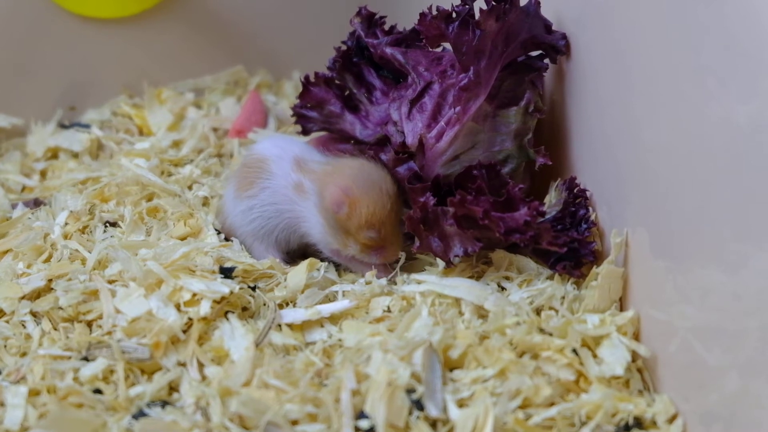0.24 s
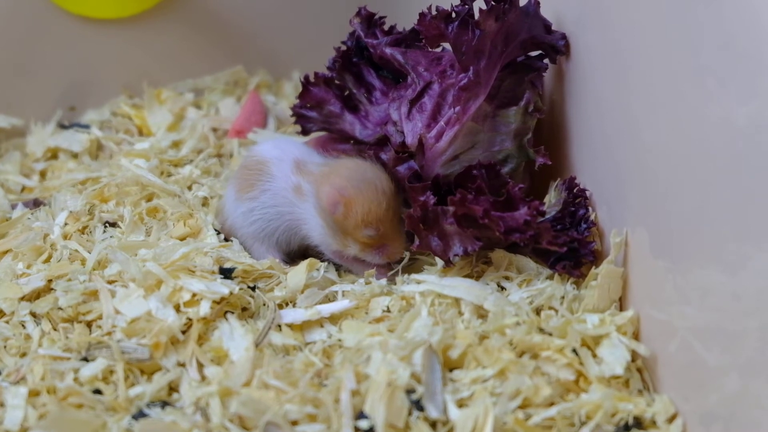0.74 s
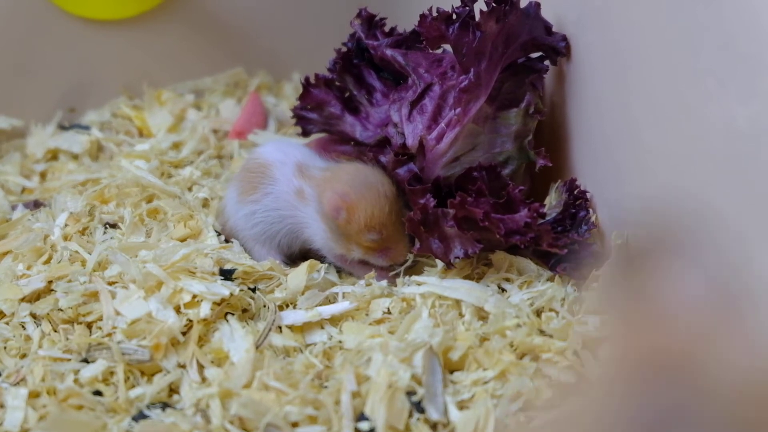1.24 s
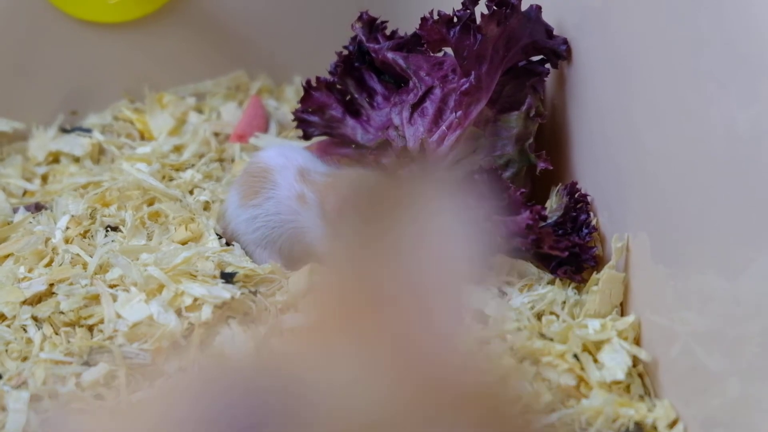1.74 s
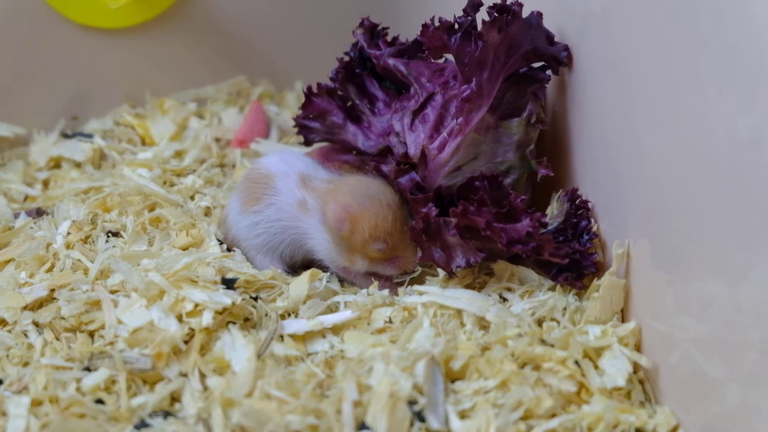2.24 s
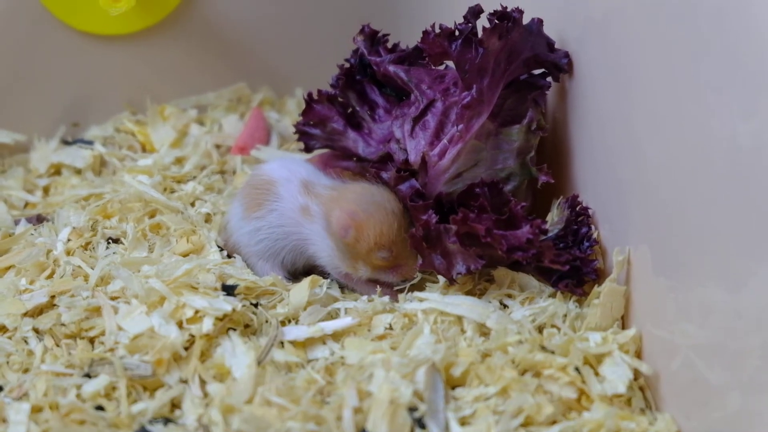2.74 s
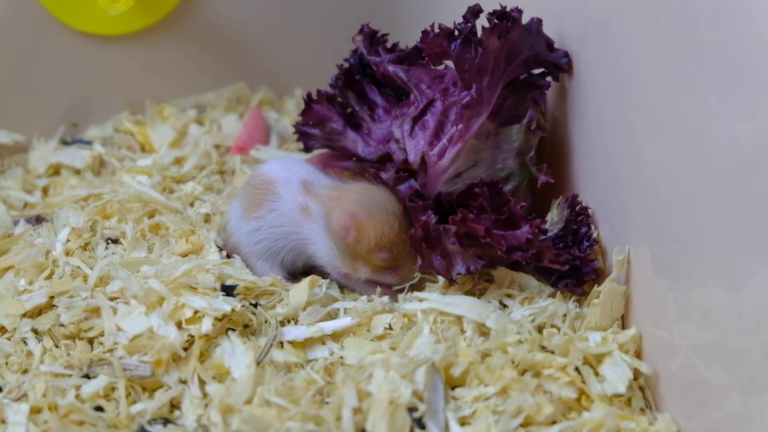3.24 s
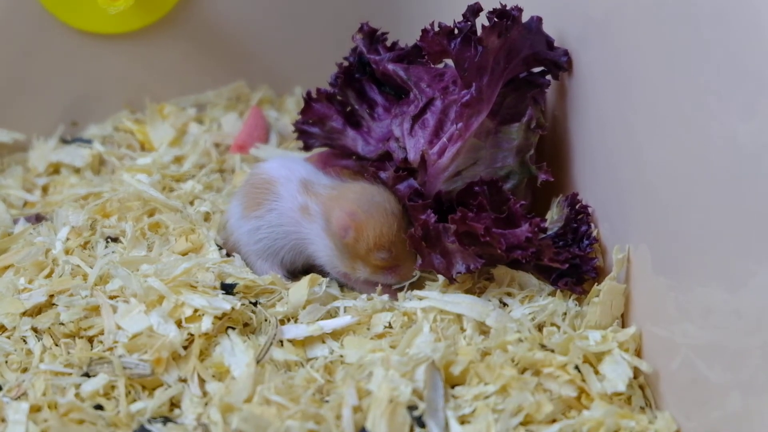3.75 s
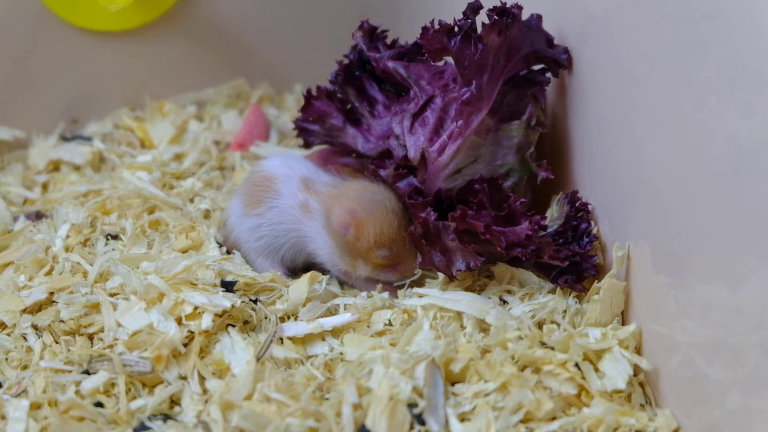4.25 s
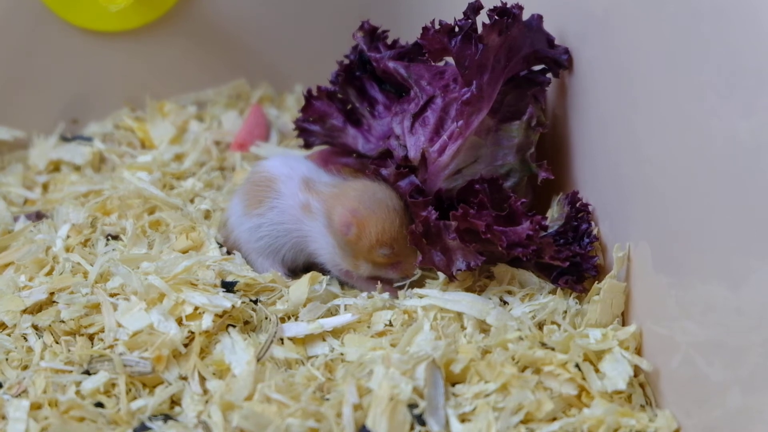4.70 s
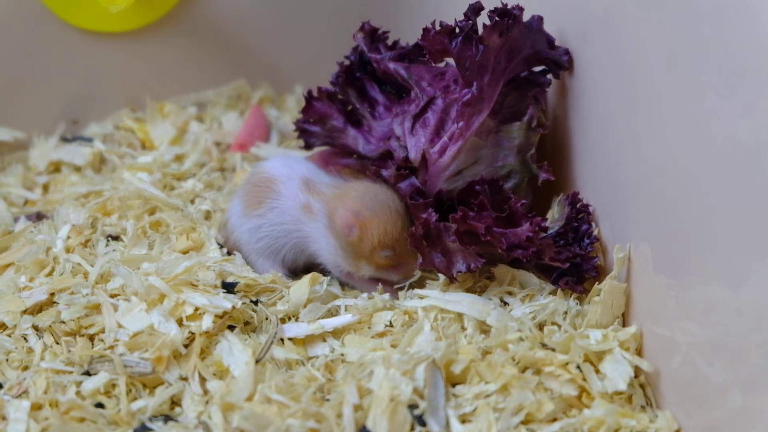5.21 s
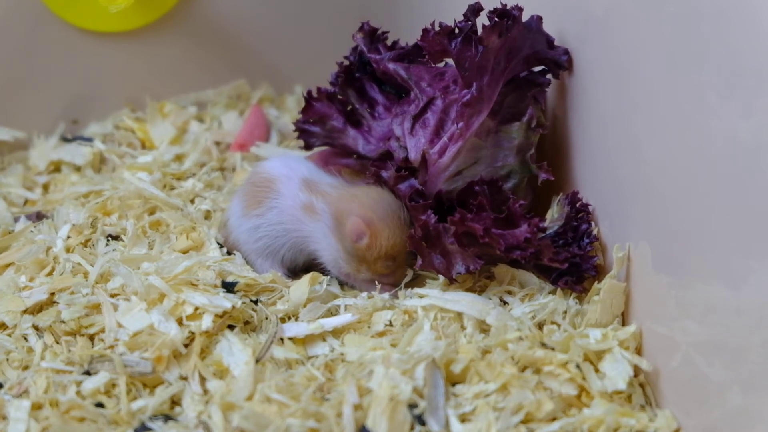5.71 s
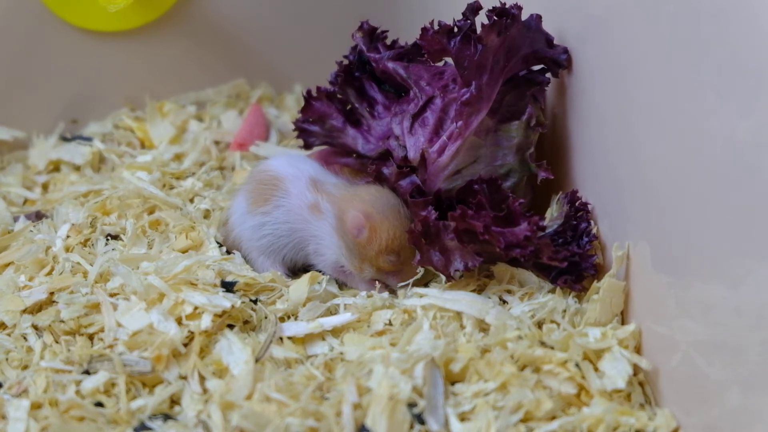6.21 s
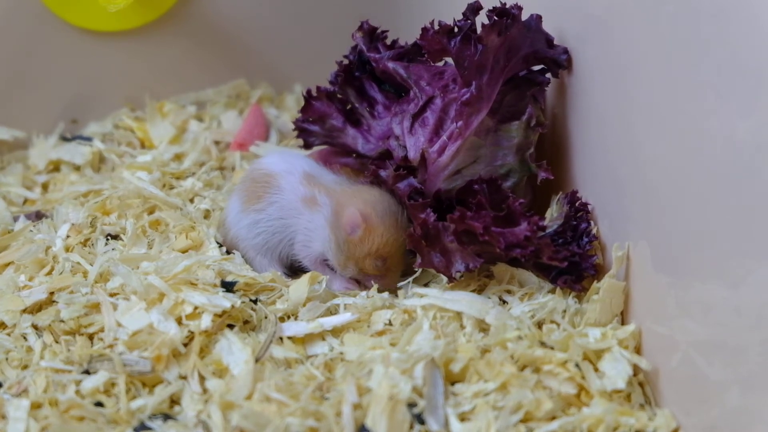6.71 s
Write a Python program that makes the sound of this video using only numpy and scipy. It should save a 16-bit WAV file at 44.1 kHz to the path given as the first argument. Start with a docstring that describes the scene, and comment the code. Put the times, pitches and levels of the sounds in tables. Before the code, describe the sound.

Small dull knocks and dry ticks against a camera stand, with faint rustling of wood shavings and leaf in a quiet, softly hissing room.

```python
"""Hamster cage in a quiet room

Near a camera on a stand, small knocks set the stand ringing low as damped sines, with a noise thud.
Dry ticks are noise bursts through three resonances; a little metal part jingles on two damped modes.
The stand sways slowly; leaf and wood shavings rustle, scuff and settle as swelling clumps of noise grains.
Microphone hiss, a wavering rumble and a faint room hum lie underneath."""
import sys
import numpy as np
from scipy.fft import rfft, irfft, next_fast_len
from scipy.io import wavfile
from scipy.ndimage import map_coordinates

SR = 44100
rng = np.random.default_rng(int(sys.argv[2]) if len(sys.argv) > 2 else 0)


def bounce(signal):
    """Save signal as a 16-bit WAV file at the path given by the first command-line argument."""
    frames = np.transpose(np.atleast_2d(signal))
    limited = np.clip(frames, -1, 1)
    pcm = np.round(limited * 32767).astype(np.int16)
    wavfile.write(sys.argv[1], SR, pcm)


N = 306936  # length in samples

# dull knocks on the stand: start_s, level_db (peak of the stand's ring), boom_db (second deep mode over that)
KNOCK_EVENTS = [(0.222, -54, -27), (0.226, -30.5, 1), (0.24, -31.5, -2.5), (0.253, -25.5, -1),
                (0.317, -48, 7), (0.354, -33.5, -2), (0.564, -41.5, -8), (0.979, -49, -13),
                (1.921, -55, -6), (2.102, -31.5, -27), (2.144, -26, -2.5), (2.431, -50, 6.5),
                (2.467, -30.5, -11), (2.53, -47.5, -1), (2.639, -37, -11), (2.816, -49.5, 3),
                (3.169, -49.5, -4), (3.274, -43.5, -4), (3.308, -50, -15), (3.361, -35.5, -10),
                (4.143, -45.5, -4), (4.22, -43, -20), (4.453, -49, -2), (4.521, -51.5, 0.5),
                (4.725, -52.5, -3), (4.829, -28.5, -36), (4.848, -16, -16), (5.025, -49.5, -12),
                (5.098, -48.5, -8), (5.347, -53, -17), (5.463, -52, -7), (5.674, -34.5, -8),
                (5.719, -39.5, -0.5), (5.771, -46, -14), (5.878, -48, -2), (5.962, -27.5, 0),
                (6.17, -49, -23.5), (6.371, -54, -18), (6.76, -60, -14)]
# bursts of rustling: start_s, length_s, level_db (top of the swell, before the buzz)
RUSTLE_BURSTS = [(0.074, .03, -74), (0.207, 0.13, -69), (0.312, 0.063, -79), (1.066, 0.14, -75),
                 (1.289, 0.064, -73.5), (1.466, 0.12, -70.5), (1.512, 0.12, -72), (1.605, 0.027, -67.5),
                 (1.71, 0.079, -69.5), (1.776, 0.06, -75.5), (1.92, 0.065, -75), (1.958, 0.11, -71),
                 (2.39, 0.11, -81), (3.133, 0.15, -73.5), (3.864, 0.19, -73.5), (4.06, 0.13, -75),
                 (4.375, 0.051, -72), (4.419, 0.032, -62), (4.513, 0.046, -62.5), (4.625, 0.045, -68.5),
                 (4.662, 0.12, -75.5), (4.722, 0.022, -62), (4.758, 0.11, -70.5), (4.84, 0.08, -63),
                 (5.384, 0.0307, -72.5), (6.586, 0.045, -85)]
# treble colour of the shavings: pitch_hz, gain_db
SHAVINGS_COLOUR = [(1940, -26), (3300, -3.5), (4990, 1), (7080, 3), (7610, 5), (8550, 3), (9300, 0),
                   (15500, -24)]
USUAL_DB = -40  # level of an ordinary knock or tick


def amp(db):
    """Decibels to a linear factor."""
    return 10 ** (np.asarray(db) / 20)


def unit(x):
    """Scales to an rms of 1."""
    return x / np.sqrt(np.mean(x ** 2) + 1e-20)


def along(points, hz):
    """Reads a curve of (Hz, value) points on a log frequency axis."""
    f, value = np.transpose(points)
    return np.interp(np.log(hz + 1), np.log(f + 1), value)


def wobble(rate):
    """A smooth random curve with so many knots a second."""
    knots = rng.standard_normal(int(N * rate / SR) + 4)
    return map_coordinates(knots, [np.arange(N) * rate / SR])


def filtered(x, response):
    """Shapes a sound by a response given as a function of frequency."""
    size = next_fast_len(x.shape[-1] + 8192)
    spectrum = rfft(x, size) * response(np.fft.rfftfreq(size, 1 / SR))
    return irfft(spectrum, size)[..., :x.shape[-1]]


def resonance(f, hz, width):
    """Response of one damped resonance, 1 at its centre."""
    return 1j * f * width / (hz * hz - f * f + 1j * f * width)


def rise(t, seconds):
    """A soft attack that closes in on 1 exponentially."""
    return 1 - np.exp(-t / seconds)


def stereo(pair, spectrum, alike):
    """Colours two unrelated signals and mixes them to a given left-right likeness, rms 1."""
    turn = lambda hz: np.arccos(np.clip(along(alike, hz), -1, 1)) / 2
    response = lambda hz: amp(along(spectrum, hz)) * [np.cos(turn(hz)), np.sin(turn(hz))]
    mid, side = filtered(pair, response)
    return unit(np.array([mid + side, mid - side]))


def add(track, s, sound):
    """Mixes a sound into the track at s seconds."""
    part = track[:, max(round(s * SR), 0):][:, :sound.shape[-1]]
    part += sound[..., :part.shape[-1]]


def ring(modes, t, scatter_db, attack):
    """Damped modes with strengths and tuning varied at each strike, peak 1."""
    hz, db, t60 = np.transpose(modes)[..., None]
    chance = rng.standard_normal((2, len(modes), 1))
    level = amp(db + scatter_db * chance[0] - 60 * t / t60)
    waves = level * np.sin(2 * np.pi * hz * (1 + 0.033 * chance[1]) * t)
    wave = waves.sum(axis=0) * rise(t, attack)
    return wave / np.abs(wave).max()


def knocks():
    """A knock rings the stand, with a rough thud and deep modes of its legs; hard ones sound leaner."""
    # modes of the stand, before their scatter: pitch_hz, level_db, t60_s
    stand_modes = [(229.3, -2.5, 0.12), (283.9, 6.5, 0.074), (331.5, -6.5, 0.17), (398, -53, 0.014),
                   (180.2, -14.5, 0.32)]
    # higher modes near the camera, before their scatter: pitch_hz, level_db, t60_s
    head_modes = [(449, 2, 0.023), (581, 4.5, 0.072), (764, -9, 0.045), (920, -16, 0.02), (1116, -13, 0.1)]
    # deep modes of the legs: pitch_hz, t60_s
    leg_modes = [(59, .56), (97, .3)]
    head_usual_db, head_slope = -9.5, -0.32  # over the stand; slope in dB per dB of a harder knock
    deep_usual_db, deep_slope = -2, -0.26  # the same for the deepest mode
    deep_follows = 0.26  # dB that the deepest mode gains per dB of the second
    thud_band = lambda f: resonance(f, 380, 450) ** 2
    out, t = np.zeros((2, N)), np.arange(SR // 2) / SR
    for s, db, boom_db in KNOCK_EVENTS:
        harder_db = db - USUAL_DB
        head_db = head_usual_db + head_slope * harder_db
        deep_db = deep_usual_db + deep_slope * harder_db + deep_follows * boom_db
        stand = ring(stand_modes, t, scatter_db=2.5, attack=0.0019)
        head = ring(head_modes, t, scatter_db=9.0, attack=0.0012)
        head = amp(head_db) * head * amp([[-2.5], [2.5]])  # stronger on the right
        thud = filtered(rng.standard_normal((2, len(t))) * amp(-60 * t / 0.16), thud_band)
        thud = 0.25 * thud / np.abs(thud).max()
        legs = sum(amp(level_db - 60 * t / t60) * np.sin(2 * np.pi * hz * t)
                   for (hz, t60), level_db in zip(leg_modes, (deep_db, boom_db)))
        add(out, s, amp(db) * (stand + head + thud + legs * rise(t, 0.0042)))
    return out


def ticks():
    """A short noise burst with a weak tail, heard through three broad resonances; hard ones last longer."""
    # dry ticks and snaps: start_s, level_db (peak of the body band), bright_db (middle band over the body)
    tick_events = [(0.221, -36.5, -31), (0.23, -30.5, -31), (0.241, -29.5, -32), (0.252, -27, -17),
                   (0.318, -48, -11), (0.354, -36.5, -38), (0.551, -53, -25), (0.565, -43.5, -20),
                   (1.282, -43.5, -24), (1.365, -52.5, -14), (1.397, -49.5, -22), (1.523, -47, -8),
                   (1.636, -48.5, -22), (1.653, -42, -16), (1.737, -47.5, -6.5), (1.92, -48, -11),
                   (2.01, -63, 0), (2.081, -44.5, 16.5), (2.102, -48, -20), (2.143, -24.5, -32),
                   (2.43, -44, -17), (2.437, -52, -20), (2.465, -50, -7), (2.533, -55.5, -7),
                   (2.549, -53.5, -9), (2.64, -49.5, -10), (2.818, -45.5, -26), (3.048, -51, -13),
                   (3.162, -52, 2), (3.167, -48, -12), (3.252, -49.5, -11), (3.275, -52, -22),
                   (3.31, -45.5, -24), (3.364, -41.5, -9), (4.144, -47.5, -13), (4.178, -50.5, -6),
                   (4.19, -48, -24), (4.375, -52.5, -9), (4.424, -64, 7), (4.454, -45.5, -24),
                   (4.516, -46.5, 3), (4.539, -47, -9), (4.628, -60, 3), (4.701, -57, 3), (4.726, -47, 2.5),
                   (4.801, -46.5, -14), (4.836, -32, -20), (4.847, -17, -11.5), (4.855, -31.5, -14),
                   (4.926, -58, 1), (5.122, -45.5, -12), (5.192, -48.5, -9), (5.653, -44, -9),
                   (5.67, -44, -8), (5.702, -48, -20), (5.721, -56, -14), (5.735, -45.5, -26),
                   (5.772, -48, -23), (5.777, -43, -10.5), (5.795, -55, -4), (5.832, -55.5, -21),
                   (5.881, -52, -18), (5.962, -27.5, -32), (5.988, -50, -22), (6.024, -53, -5),
                   (6.595, -46, -9), (6.643, -46, -7.5), (6.892, -54.5, 1)]
    # body, middle and top resonances: pitch_hz, width_hz
    bands = [(1350, 2390), (4800, 2300), (9500, 6000)]
    # tail of a tick in each band: t60_s
    tails = [0.1, 0.064, 0.058]
    usual_t60, longer_db = 0.019, 94  # s for an ordinary tick; ten times longer for so many dB more
    top_grows = 1.29  # the top band moves more than the brightness, dB per dB
    top_usual_db, top_slope = -2.5, -0.23  # further offset of the top band; dB per dB of a harder tick
    out, t = np.zeros((2, N)), np.arange(SR // 12) / SR
    for s, db, bright_db in tick_events:
        harder_db = db - USUAL_DB
        t60 = usual_t60 * 10 ** (harder_db / longer_db)
        top_db = top_grows * bright_db + top_usual_db + top_slope * harder_db
        puff = rng.standard_normal((3, len(t)))
        noise = puff[0] + 0.72 * puff[1:]  # a shared part and one for each side
        for (hz, width), level_db, tail in zip(bands, (0, bright_db, top_db), tails):
            decay = amp(-60 * t / t60) + 0.17 * amp(-60 * t / tail)
            burst = noise * decay * rise(t, 0.00027)
            burst[:, round(.0006 * SR)] -= 3.5  # the first hard contact
            part = filtered(burst, lambda f: resonance(f, hz, width) ** 3)
            add(out, s - .0004, amp(db + level_db) * part / np.abs(part).max())
    return out


def jingles():
    """A metal part rings on two damped modes, also faintly in each rustle; a second part pings longer."""
    # jingles of the metal part: start_s, level_db (before each mode's own level)
    jingle_events = [(0.234, -50), (0.261, -48.5), (0.2744, -61), (0.5706, -64), (1.286, -64),
                     (1.3658, -65), (1.485, -61), (1.555, -55), (1.61, -53.5), (1.6535, -56), (2.053, -65),
                     (2.4109, -69), (2.6125, -68), (2.846, -65), (3.141, -57), (3.1615, -37.5),
                     (3.1964, -46), (3.2016, -44), (3.2236, -50), (3.4084, -64), (3.8804, -58.5),
                     (4.147, -62), (4.2577, -60), (4.778, -67), (4.8504, -31.5), (5.3872, -66),
                     (5.4457, -65), (5.654, -57.5), (5.6775, -62), (5.778, -63), (5.9638, -61),
                     (6.0257, -64), (6.5959, -62), (6.892, -57)]
    # modes of the metal part: pitch_hz, level_db, t60_s
    metal_modes = [(7665, 2.5, 0.043), (12150, -8.5, 0.037)]
    # lone pings of a second metal part: start_s, level_db, pitch_hz
    ping_events = [(1.31, -68.5, 1990), (2.046, -64, 4480), (2.148, -66, 4500), (2.152, -55.5, 2055),
                   (2.842, -60.5, 4470), (3.881, -67, 4500), (4.256, -68, 4550), (4.668, -62, 4440),
                   (4.799, -65, 4570), (4.881, -62, 4470)]
    ping_cycles = 580  # cycles to fall 60 dB
    shaken_db = 2.5  # faint jingles during a rustle, over the rustle
    out, t = np.zeros((2, N)), np.arange(SR // 6) / SR
    # left and right phase of each mode in radians; the upper mode is over a quarter cycle apart
    phases = np.array([[.45, -0.52], [.9, -0.99]])
    moments = rng.random(len(RUSTLE_BURSTS))
    shaken = [(s + length * moment, db + shaken_db)
              for (s, length, db), moment in zip(RUSTLE_BURSTS, moments)]
    for s, db in [*jingle_events, *shaken]:
        chance = rng.standard_normal((2, 3))
        # only the upper mode varies in strength
        for (hz, mode_db, t60), phase, spread_db, (detune, start, size) in zip(
                metal_modes, phases, (0, 4), chance):
            wave = np.sin(2 * np.pi * hz * (1 + 0.00067 * detune) * t + start + phase[:, None])
            level = amp(db + mode_db + spread_db * size - 60 * t / t60)
            add(out, s - .0006, level * rise(t, 0.0001) * wave)
    for s, db, hz in ping_events:
        level = amp(db - 60 * t * hz / ping_cycles) * rise(t, .002)
        add(out, s, level * np.sin(2 * np.pi * hz * t))
    return out


def sway():
    """The stand sways under the hand: a few slow cycles swell and fade, the pitch drifting a little."""
    # sways: start_s, level_db (top of the swell), pitch_hz (at the start)
    sway_events = [(0.196, -38, 35), (0.523, -50.5, 44.8), (0.931, -55, 45), (1.521, -50.5, 50),
                   (1.656, -50, 55.3), (1.801, -54.5, 52.8), (2.052, -39.5, 41.5), (2.419, -41, 48.4),
                   (2.551, -65, 55.6), (2.786, -42, 53.7), (2.93, -50, 56.5), (3.101, -47, 48),
                   (3.23, -46, 55), (3.3, -41, 36.3), (3.45, -53.5, 33), (3.92, -46, 54.6),
                   (4.054, -42.5, 43.7), (4.193, -41, 53.6), (4.396, -43, 47.2), (4.641, -46, 52.4),
                   (5.431, -43.5, 50.4), (5.635, -40, 43.2), (5.76, -43.5, 56.1), (5.924, -37.5, 32.2)]
    length = 0.19  # s
    out, t = np.zeros((2, N)), np.arange(round(length * SR)) / SR
    for s, db, hz in sway_events:
        start, drift = rng.random(2)
        cycles = hz * t * (1 + 0.12 * (drift - .5) * t / length) + start
        swell = np.abs(np.sin(np.pi * t / length)) ** 1.2
        add(out, s, amp(db) * swell * np.sin(2 * np.pi * cycles))
    return out


def grains(spectrum, spiky_db, share):
    """Dense tiny noise grains in clumps, a small share of them standing out, rms 1."""
    spikes_db = spiky_db * rng.exponential(size=N) * (rng.random(N) < share)
    size_db = spikes_db + 1.5 * wobble(50) + 2.5 * wobble(200)
    noise = rng.standard_normal((2, N)) * amp(np.minimum(size_db, 26))
    return stereo(noise, spectrum, [(3000, 0.52)])  # the same likeness at every pitch


def rustle():
    """Shavings and leaf whisper in the treble, set small parts buzzing, and scuff lower down."""
    # coarse scuffs with no whisper: start_s, length_s, level_db (top of the swell)
    lone_scuffs = [(2.058, .1, -62), (4.132, .07, -71), (4.915, 0.14, -69), (5.086, 0.13, -65.5),
                   (5.622, 0.044, -61.5), (5.678, .15, -65), (5.98, .048, -68)]
    # colour of the scuffing: pitch_hz, gain_db
    scuff_colour = [(200, -26), (450, 1.5), (1000, -3.5), (2200, -5.5), (3500, -7.5), (6000, -33),
                    (12000, -54.5)]
    # small parts shaken along by the rustle: pitch_hz, width_hz, gain_db (before the common 2.5 times)
    buzz_modes = [(4460, 61, 6), (5100, 360, -6.5), (6700, 48, 3), (7350, 72, -12), (8030, 100, -23),
                  (9350, 85, 1.5), (13500, 200, -1)]
    scuff_db = 2.5  # scuffing over the fine rustle
    drag_db, drag_t60 = -35.5, 0.44  # scuffing after each knock: dB over the knock, s
    whisper_level, scuff_level = level = np.zeros((2, N))
    t = np.arange(SR // 3) / SR

    def swell(length):
        """A quick rise and slower fall over a length in seconds."""
        return np.abs(np.sin(np.pi * np.linspace(0, 1, round(length * SR)) ** 0.44)) ** 1.08

    def buzz(f):
        """The direct sound plus the resonances of the small parts."""
        return 1 + 2.5 * sum(amp(db) * resonance(f, hz, width) for hz, width, db in buzz_modes)

    for s, length, db in RUSTLE_BURSTS:
        add(level, s, amp([[db], [db + scuff_db]]) * swell(length))
    for s, db, _ in KNOCK_EVENTS:
        add(level[1:], s, amp(db + drag_db - 60 * t / drag_t60) * rise(t, 0.0042))
    for s, length, db in lone_scuffs:
        add(level[1:], s, amp(db) * swell(length))
    whisper = whisper_level * grains(SHAVINGS_COLOUR, spiky_db=4.5, share=.02)
    scuffing = scuff_level * grains(scuff_colour, spiky_db=8, share=.006)
    return filtered(whisper, buzz) + scuffing


def settling():
    """Shavings settle with faint stray ticks of decaying noise, about nine a second."""
    out, t = np.zeros((2, N)), np.arange(SR // 100) / SR
    for when, size in rng.random((round(9 * N / SR), 2)):
        level = amp(-66 + 9 * size - 60 * t / .008)
        add(out, when * N / SR, level * rng.standard_normal(len(t)))
    return filtered(out, lambda hz: amp(along(SHAVINGS_COLOUR, hz)))


def room():
    """Steady hiss over a wavering rumble, with a few narrow bands of noise as hum."""
    # colour of hiss and rumble: pitch_hz, gain_db
    air_colour = [(12, -26), (20, 2.5), (46, -5), (123, -5), (181, -12), (283, -12), (316, -19), (395, -18),
                  (430, -25.5), (523, -21.5), (1020, -25.5), (1780, -30.5), (2170, -30), (8270, -38.5),
                  (15700, -39)]
    # left-right likeness of hiss and rumble: pitch_hz, likeness (1 = identical)
    likeness = [(60, 0.71), (150, 0.3), (380, 0.23), (950, 0.29), (2380, 0.36), (5980, 0.0034),
                (15000, 0.068)]
    # hum bands: pitch_hz, width_hz (from the centre to where it is 6 dB down), gain_db
    hum_bands = [(99.8, 3.4, -37), (179.2, 7.4, -35.5), (397, 1.68, -39), (1100, 6, -51)]
    hum = lambda f: sum(amp(db) / (1 + ((f - hz) / width) ** 2) for hz, width, db in hum_bands)
    noise = rng.standard_normal((3, N))
    air = amp(-58) * stereo(noise[:2], air_colour, likeness)
    rumble = filtered(air, lambda f: 1 / (1 + (f / 400) ** 4))  # the part below about 400 Hz
    waver = amp(1.05 * wobble(3.3)) - 1
    return air + waver * rumble + filtered(noise[2], hum)


def scene():
    """All the layers together."""
    return knocks() + ticks() + jingles() + sway() + rustle() + settling() + room()


def record(dry):
    """The two microphones differ slightly in sensitivity over pitch; nothing is kept above 15830 Hz."""
    # left over right: pitch_hz, difference_db
    lean = [(60, 3), (180, 3.5), (550, 1.5), (1650, -0.5), (4970, 0.5), (15000, 1)]
    side = np.array([[1], [-1]])
    return filtered(dry, lambda hz: amp(side * along(lean, hz) / 2) * (hz < 15830))


dry = scene()
out = record(dry)
bounce(out)
```